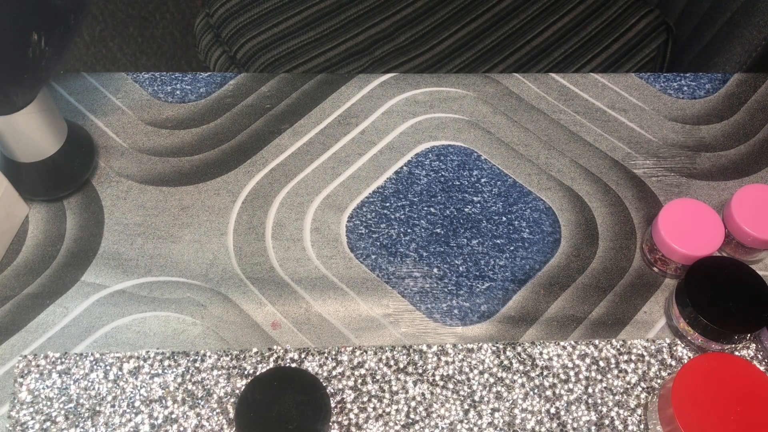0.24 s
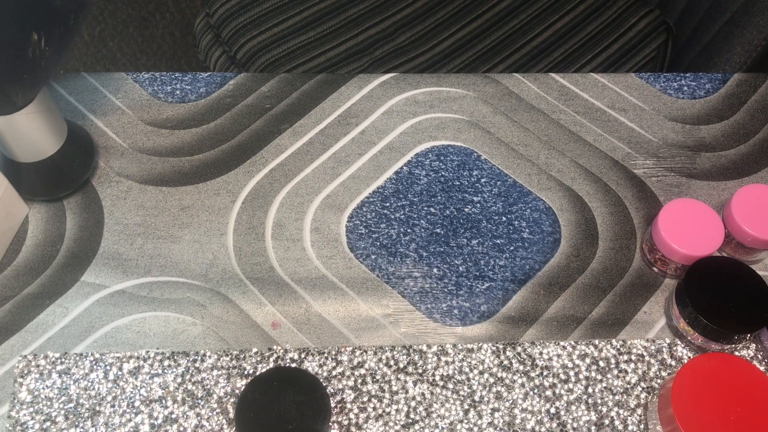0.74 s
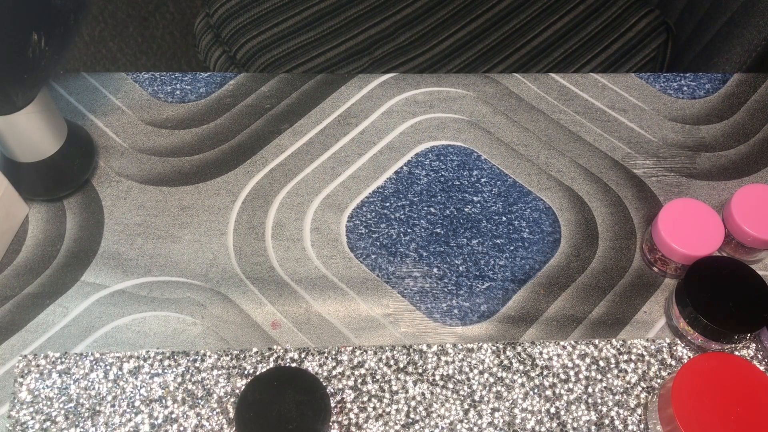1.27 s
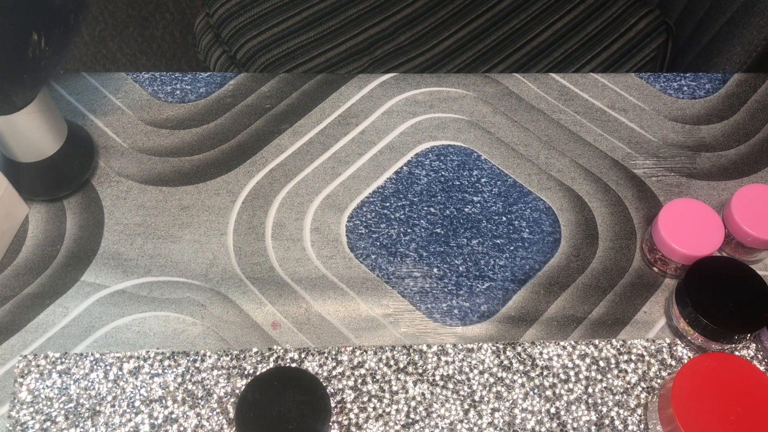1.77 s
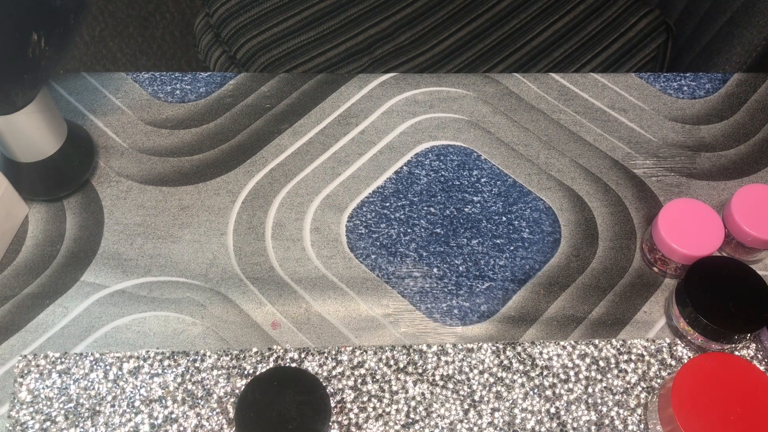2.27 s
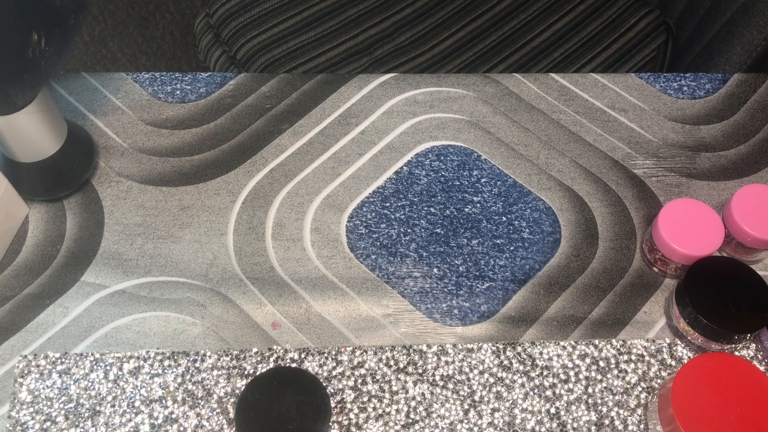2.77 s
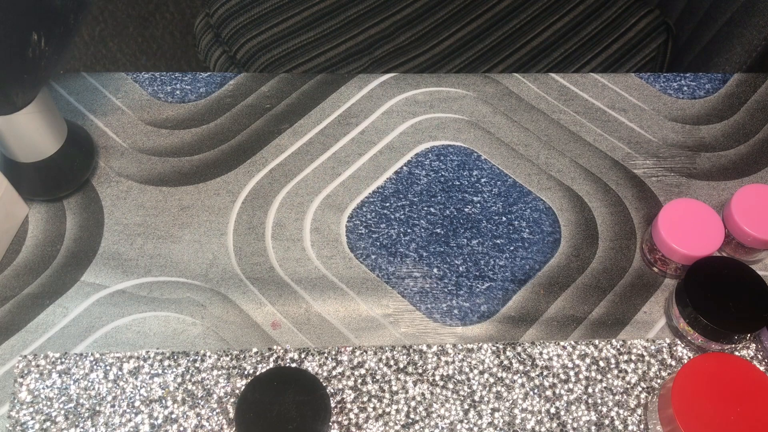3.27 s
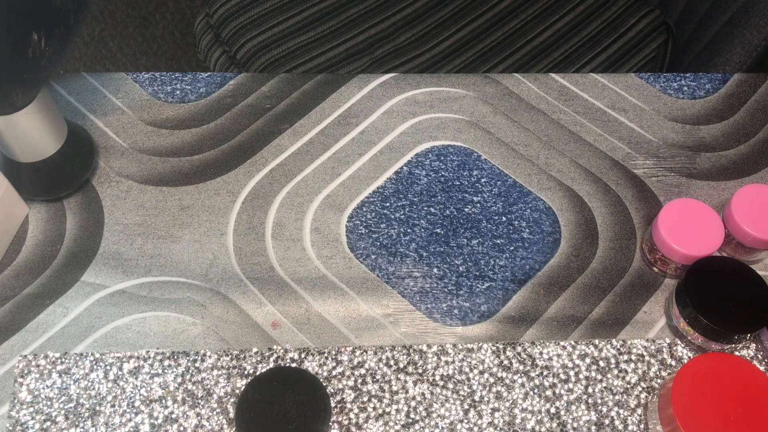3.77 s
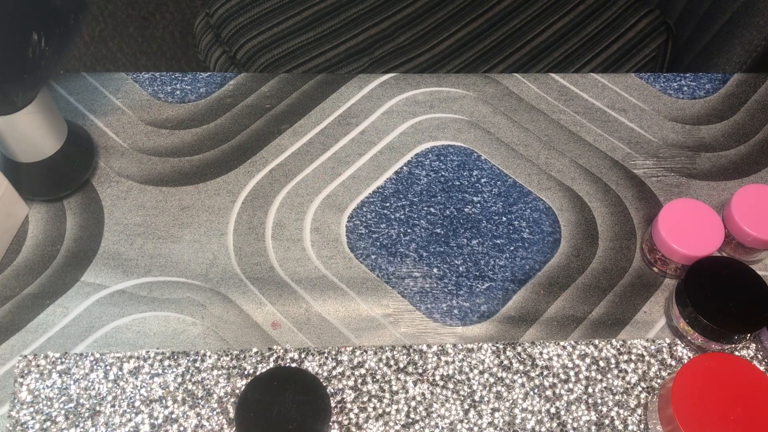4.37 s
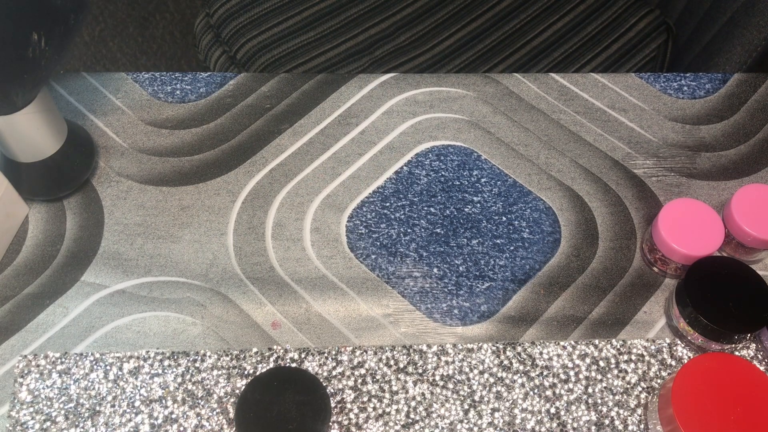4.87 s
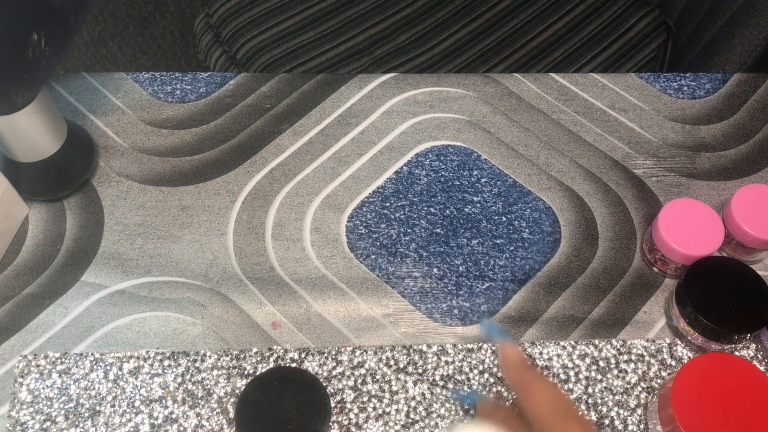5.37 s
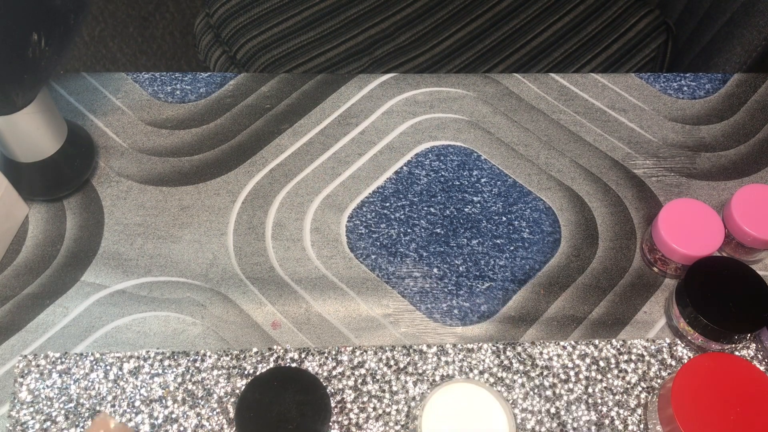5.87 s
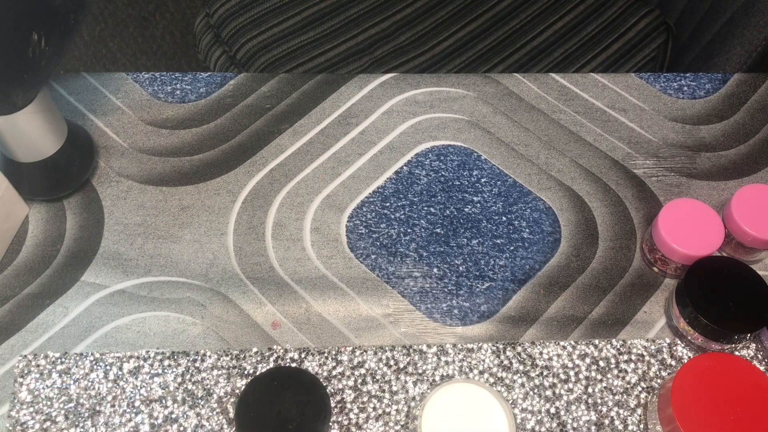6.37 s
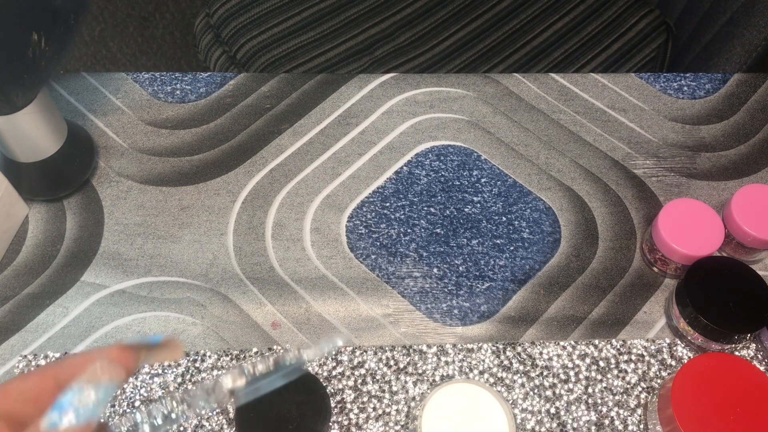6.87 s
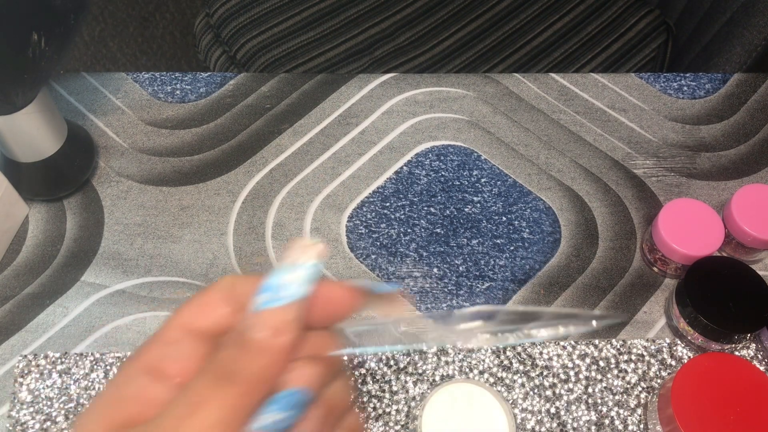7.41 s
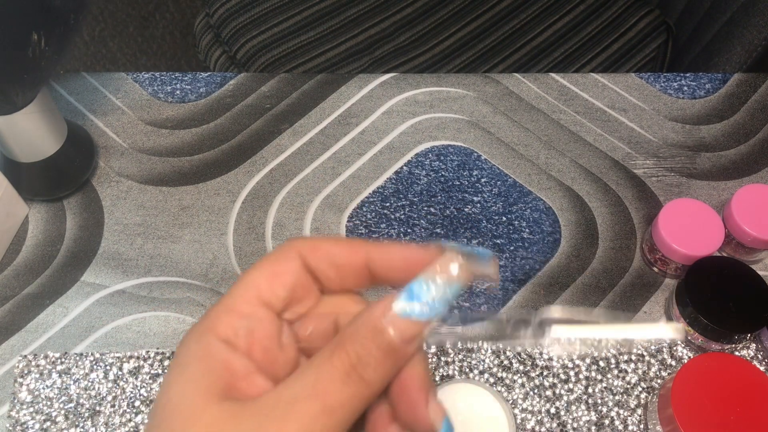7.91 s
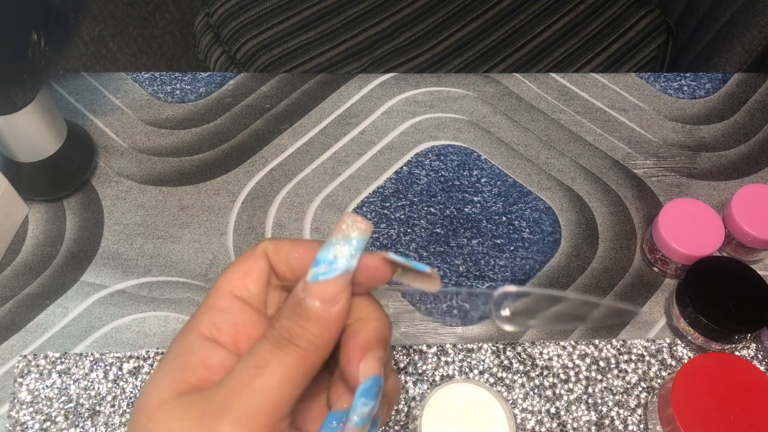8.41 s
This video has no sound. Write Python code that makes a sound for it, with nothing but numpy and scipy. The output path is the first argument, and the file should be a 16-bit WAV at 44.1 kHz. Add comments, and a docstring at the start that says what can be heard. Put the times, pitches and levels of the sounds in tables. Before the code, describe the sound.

Long nails tick on small plastic jars, a lid snaps and grates, a jar slides and knocks down, then faint clicks in a quiet room.

```python
"""Plastic jars on a table

Small plastic jars are handled close by on a table in a quiet room. Long nails tick and scratch on them,
a lid snaps loose and grates on its thread, a jar slides and is set down, then a thin plastic stick is picked up.
Ticks and rubbing are bursts of noise through plastic resonances; knocks are decaying sines.
The slide is gritty noise. Behind it, filtered noise makes the air and rumble;
the low hum is narrow noise with a steady sine.
"""
import sys
import numpy as np
from scipy import signal
from scipy.fft import rfft, irfft, next_fast_len
from scipy.io import wavfile

SR = 44100
rng = np.random.default_rng(int(sys.argv[2]) if len(sys.argv) > 2 else 0)


def generate_wav(signal):
    """Clip the signal to [-1, 1] and save it as 16-bit WAV at the path in sys.argv[1]."""
    frames = np.transpose(np.atleast_2d(signal))
    scaled = np.clip(frames, -1, 1) * 32767
    pcm = np.round(scaled).astype(np.int16)
    wavfile.write(sys.argv[1], SR, pcm)


N = 381450
TIME = np.arange(N) / SR


def from_db(db):
    """Decibels to gain."""
    return 10 ** (np.asarray(db) / 20)


def rms_one(x):
    """Scale to unit rms."""
    return x / np.sqrt(np.mean(x ** 2) + 1e-24)


def add(track, s, sound):
    """Mix a sound into the track at time s, trimming what runs past the end."""
    at = int(round(s * SR))
    track[at:at + len(sound)] += sound[:N - at]


def cut(x, hz, kind, order=2):
    """Butterworth filter."""
    return signal.sosfilt(signal.butter(order, hz, kind, fs=SR, output="sos"), x)


def resonate(x, modes):
    """Parallel resonances from (f/Hz, width/Hz, level/dB), with alternating signs."""
    out = 0
    for k, (hz, width, db) in enumerate(modes):
        r = np.exp(-np.pi * width / SR)
        poles = [1, -2 * r * np.cos(2 * np.pi * hz / SR), r * r]
        mode = signal.lfilter([1, 0, -1], poles, x) * (1 - r * r) / 2
        out = out + (-1) ** k * from_db(db) * mode
    return out


def ringing(modes):
    """Half a second of decaying sines from (f/Hz, level/dB, t60/s), neighbours in opposite phase."""
    t, out = TIME[:SR // 2], 0
    for k, (hz, db, t60) in enumerate(modes):
        decay = np.exp(-np.log(1000) * t / t60)
        out = out + (-1) ** k * from_db(db) * decay * np.sin(2 * np.pi * hz * t)
    return out


def at_hz(points, hz, column=1):
    """Read a table on a log-frequency axis."""
    points = np.array(points)
    return np.interp(np.log(hz), np.log(points[:, 0]), points[:, column])


def grains(count, per_s, spread_db, smooth):
    """Friction: random tiny slips of uneven size over a smooth hiss."""
    size_db = spread_db * np.minimum(rng.exponential(1, count), 3)
    sizes = from_db(size_db) * rng.choice([-1, 1], count)
    slips = sizes * (rng.random(count) < per_s / SR)
    return rms_one(slips) + smooth * rng.standard_normal(count)


def scatter(start, end, per_s):
    """Uneven moments in a span, one at a random place in each equal slot."""
    count = int(round((end - start) * per_s))
    return start + (end - start) * (np.arange(count) + rng.random(count)) / count


# Resonances of a jar's hollow inside, thin wall and hard edge: (f/Hz, width/Hz, level/dB)
HOLLOW = [(500, 160, -4.5), (1057, 280, -7.5), (1183, 720, -1), (1930, 620, 2)]
WALL = [(2760, 420, -2.5), (3010, 870, -4), (3382, 220, -7), (4296, 900, -11)]
EDGE = [(5918, 1200, 4), (7730, 1400, -1.5), (9180, 1800, -0.5), (11660, 2100, -2), (15300, 2700, -4)]


def plastic(force, hollow_db, edge_db, wall_spot, edge_spot, spot_spread_db=2.5):
    """A jar rings with its wall (unit rms), hollow and edge; each spot touched favours other modes."""
    def uneven(modes):
        return [(hz, width, db + spot_spread_db * rng.normal()) for hz, width, db in modes]

    hollow = cut(resonate(force, HOLLOW), [850, 2100], "band")
    wall = cut(resonate(force, wall_spot + uneven(WALL)), [2200, 4700], "band", order=3)
    edge = cut(resonate(force, uneven(EDGE) + edge_spot), 5100, "high", order=3)
    return from_db(hollow_db) * rms_one(hollow) + rms_one(wall) + from_db(edge_db) * rms_one(edge)


# Clearest plastic clicks: (t/s, wall level/dB over 5 ms, hollow level/dB re wall, edge level/dB re wall,
# wall f/Hz, contact t/s)
CLICKS = [(0.595, -62.5, 2, 1, 2520, .0011), (0.8392, -47.5, -17, -1.5, 4430, .0003),
          (0.978, -62, -7, -5, 2500, 0.0014), (1.1238, -60.5, -4, -14, 3150, .0011),
          (1.1451, -34.5, -15, 2, 2380, 0.00085), (1.202, -35.5, -10, 2.5, 3940, 0.00043),
          (1.436, -51.5, -23, 4, 2580, 0.00055), (1.4805, -54, -22, 14.5, 4440, 0.00024),
          (1.5923, -44.5, -33, -8, 4900, 0.00067), (1.6854, -25.5, -16.5, -8, 2830, 0.00095),
          (1.712, -31, -11, -8, 3230, 0.00039), (1.7168, -24.5, -10, -8, 3050, 0.0019),
          (1.7323, -33.5, -10, 2, 3000, 0.0012), (1.74, -24, -11, -8, 3940, 0.00046),
          (1.7644, -26.5, -11, -14, 3360, 0.00058), (1.7831, -24, -14, -8.5, 3370, 0.001),
          (1.8004, -37, -17, -15, 3010, 0.00073), (1.8171, -26.5, -13, -11, 3600, 0.00025),
          (1.8295, -38, -18.5, -1.5, 3580, 0.00085), (1.8515, -36, -7, -4.5, 3430, .0006),
          (1.8839, -34, -19, -5, 3300, 0.00056), (1.89, -42.5, -12, -2, 3400, 0.002),
          (1.9612, -52.5, -13, -2, 2900, 0.0005), (2.011, -61, -9, 4, 3000, .0006),
          (2.0215, -55, -8, 4.5, 3080, .0009), (2.1398, -42.5, -2, 3, 2830, 0.00045),
          (2.1441, -41, 1, -11.5, 2760, 0.00061), (2.938, -53.5, -13.5, 3, 3470, 0.00027),
          (3.0075, -42.5, -29.5, 1, 2860, 0.0033), (3.1216, -74, -3, 16.5, 4540, 0.0011),
          (3.3363, -60, -4.5, 5, 2353, 0.0052), (3.7858, -59, -26, -6.5, 3820, 0.003),
          (3.8696, -52.5, -7.5, -8.5, 4513, 0.0013), (3.9578, -42, -8, 3.5, 2600, 0.002),
          (3.9782, -46.5, 5.5, 10.5, 4460, 0.0025), (4.0311, -37, -2.5, -15, 2670, 0.0037),
          (4.0423, -42.5, -4, 2, 4230, 0.0015), (4.0905, -34, -3.5, -10.5, 2840, 0.0026),
          (4.2988, -38.5, -4.5, -5, 3000, 0.0018), (4.3222, -45, -5, -12, 3300, 0.00089),
          (4.3962, -44, -4, 5.5, 4670, 0.00072), (4.4065, -50, 5.5, 13.5, 3570, 0.0019),
          (4.5008, -53, 5.5, 7.5, 2730, 0.0023), (4.526, -50, -2, 7, 4200, 0.0019),
          (4.543, -55.5, -9, 7, 3550, 0.0017), (4.5705, -54, -12, 14.5, 4024, 0.0014),
          (4.6319, -52, -9, 13, 3210, .001), (4.6457, -55, -17, 14.5, 4400, .0025),
          (4.6847, -43, -9, -1, 3300, 0.0026), (4.7001, -41, -16, -4, 2860, 0.0018),
          (4.7226, -38, -32, -30, 3420, 0.00079), (4.7845, -61, -8, 6.5, 2840, 0.0008),
          (4.829, -50.5, -.5, 5.5, 3880, 0.0021), (4.8582, -51, -2.5, 0.5, 3750, 0.00051),
          (5.1508, -66, -1, 9, 2370, .0015), (5.2824, -53.5, -10, 9, 4120, 0.0027),
          (5.3148, -62, 0, 13, 2330, 0.00049), (5.457, -51, -12, -2, 2670, 0.0028),
          (5.5432, -48.5, 0, -5, 3700, 0.0038), (6.4389, -48, -0.5, -11, 2710, 0.00078),
          (6.4555, -51, -6, -15, 2940, 0.0032), (6.634, -60.5, -9, 4.5, 4000, 0.00031),
          (6.7967, -59, -12, 7, 4080, 0.00078), (7.0143, -54, -6.5, -0.5, 3585, 0.00075),
          (7.2123, -60.5, -13.5, 6, 4375, 0.00026), (7.289, -66.5, -15, 1.5, 2760, 0.0016),
          (7.3693, -66, -17, 3, 2830, 0.0011), (7.434, -59, -20, -22, 3460, 0.0027),
          (7.6872, -57, -5, 2, 3594, 0.0012), (7.934, -71, -2.5, 2, 3210, .0011),
          (8.0776, -61, -9.5, -3.5, 3705, 0.00049)]


def clicks(rows, snap=1.2, rise_s=0.00022, linger=2.3, chatter=0.13, chatter_s=0.0027):
    """Each click is a snap and a burst of micro-slips; the spot touched adds pitches of its own."""
    out, t = np.zeros(N), TIME[:SR // 40]
    level_window_s = 0.005
    for s, db, hollow_db, edge_db, wall_hz, contact_s in rows:
        burst = np.exp(-(t / (linger * contact_s)) ** 2)
        tail = chatter * np.exp(-t / chatter_s)   # the parts chatter on faintly
        force = rng.standard_normal(len(t)) * (1 - np.exp(-t / rise_s)) * (burst + tail)
        force[0] += 2 * snap
        edge_hz = 6270 * 2 ** (0.22 * edge_db)   # a stronger edge rings higher, 0.22 octaves per dB
        click = plastic(force, hollow_db, edge_db, [(wall_hz, 560, 8)], [(edge_hz, 1300, 0)])
        add(out, s, from_db(db) * np.sqrt(level_window_s / t[-1]) * click)
    return out


# Strokes of nails and thread on plastic: (start t/s, end t/s, wall level/dB, hollow level/dB re wall,
# edge level/dB re wall, f/Hz)
STROKES = [(0.569, 0.608, -78, 4, 4, 3000), (0.709, 0.868, -80, -2, -4, 3620),
           (1.419, 1.476, -68.5, -4, 8, 3030), (1.468, 1.51, -63.5, -19, 3.5, 3330),
           (1.564, 1.621, -60.5, -27, -0.5, 3530), (1.661, 1.872, -60.5, -9, -1.5, 3320),
           (1.864, 1.942, -62.5, -2.5, -3.5, 3200), (2.506, 2.548, -74.5, -3, -12, 2580),
           (3.254, 3.574, -82, -1.5, 2.5, 2990), (3.391, 3.469, -72, -19, -12, 2220),
           (3.845, 3.969, -71.5, -3.5, -5, 3800), (3.962, 4.084, -59, -3, -1, 3570),
           (4.297, 4.376, -58.5, -5, -7, 2480), (4.364, 4.458, -60.5, 1, 2.5, 3120),
           (4.502, 4.648, -60, -1.5, 1, 2500), (4.633, 4.744, -57, 0, 4, 3140),
           (4.741, 4.914, -64.5, -2.5, -1, 2570), (6.448, 6.501, -58, -8, -8.5, 2700),
           (6.49, 6.624, -71, -10, 7.5, 3270), (6.627, 6.679, -63, -13, -3, 4200),
           (7.201, 7.297, -80, -7.5, -2, 3500), (7.423, 7.6, -77.5, -6.5, 2, 2400)]


def rubbing(catches_per_s=380, catch_db=2.5, catch_s=0.0018, drag=0.42, fade_s=0.0079, squeak=1.3):
    """Nails and the lid's thread drag over the plastic, catching and letting go in little bursts of grit."""
    out = np.zeros(N)
    for start, end, db, hollow_db, edge_db, hz in STROKES:
        length = end - start
        t = TIME[:int((length + .02) * SR)]
        pressure = np.clip(np.minimum(t, length - t) / fade_s, 0, 1)
        catches = np.abs(grains(len(t), catches_per_s, spread_db=catch_db, smooth=0))
        grip = drag + rms_one(signal.lfilter([1], [1, -np.exp(-1 / (catch_s * SR))], catches))
        force = pressure * grip * rng.standard_normal(len(t))
        spot = [(hz, 330, -squeak * edge_db)]   # a duller stroke squeaks more at its own pitch
        add(out, start, from_db(db) * plastic(force, hollow_db, edge_db, spot, []))
    return out


def slip_ticks(slips_per_s=30, slip_db=3.5, spread_db=5, slip_edge_db=4, contact_s=0.0009):
    """A dragging nail now and then slips with a tick: small clicks strewn over the strokes."""
    rows = []
    for start, end, db, hollow_db, edge_db, _ in STROKES:
        for s in scatter(start, end, slips_per_s):
            tick_db = db + slip_db + spread_db * rng.normal()
            wall_hz = rng.uniform(2312, 4500)
            rows.append((s, tick_db, hollow_db, edge_db + slip_edge_db, wall_hz, contact_s))
    return clicks(rows)


def slide_gain(db, slowing_db_per_s, start_s=5.015, stop_s=5.57, attack_s=0.047):
    """A quick push, a steady fade as the jar slows, and a release once it stops."""
    t = np.maximum(TIME - start_s, 0)
    push_db = 9 * np.exp(-t / 0.057)
    release_db = 43 * np.maximum(TIME - stop_s, 0)   # 43 dB per second
    return np.minimum(t / attack_s, 1) * from_db(db + push_db - slowing_db_per_s * t - release_db)


# Resonances of the sliding jar: (f/Hz, width/Hz, level/dB)
SLIDE_BODY = [(673, 200, 6), (1680, 710, 5), (3110, 1100, 0)]


def sliding():
    """The jar's base brushes across the mat: the jar resonates and the mat's fibres hiss."""
    base, fibres = [grains(N, per_s=4500, spread_db=5.5, smooth=0.9) for _ in range(2)]
    body = rms_one(cut(resonate(base, SLIDE_BODY), [550, 5500], "band", order=3))
    hiss = rms_one(cut(fibres, [3600, 9500], "band", order=1))
    return slide_gain(db=-61.5, slowing_db_per_s=7.5) * body + slide_gain(db=-64.0, slowing_db_per_s=15.5) * hiss


# Dull, hollow plastic knocks, some from a lid laid on the table: (t/s, level/dB, f/Hz, t60/s)
TOCKS = [(2.1447, -45, 543, 0.041), (2.1465, -44, 1610, 0.018), (3.009, -49.5, 680, 0.023),
         (3.5292, -42, 1800, 0.04), (3.805, -62, 980, 0.037), (3.85, -60, 990, 0.099),
         (5.882, -48, 1310, 0.013), (8.378, -63.5, 1750, 0.024)]


def tocks(split=0.082):
    """Each dull, hollow plastic knock rings as a cluster of three close modes around its pitch."""
    out = np.zeros(N)
    for s, db, hz, t60 in TOCKS:
        cluster = [(hz * (1 - 2 * split), -4, t60),
                   (hz * (1 - split / 2), -2, t60),
                   (hz * (1 + 1.63 * split), 2, t60)]
        add(out, s, from_db(db) * ringing(cluster))
    return out


# A soft bump on the table, then a jar lands and rocks on it: (t/s, level/dB, contact t/s)
LANDING = [(4.201, -51, 0.017), (5.5436, -43.5, 0.00042), (5.5479, -30, 0.0015), (5.5577, -39.5, 0.0025)]
# Modes of the table top: (f/Hz, level/dB, t60/s)
TABLE = [(104, 7.5, 0.017), (153, -9, 0.15), (185, -1, 0.039), (303, 0.5, 0.04), (367, -3.5, 0.18),
         (574, -7, 0.028), (1050, -1, 0.015), (1640, -22, 0.013)]


def landing():
    """Each contact pushes the table's modes into ringing; a longer contact is duller."""
    out = np.zeros(N)
    for s, db, contact_s in LANDING:
        push = np.exp(-TIME[:SR // 50] * 2 * np.pi / contact_s)
        add(out, s, from_db(db) * np.convolve(ringing(TABLE), push / push.sum()))
    return out


# Modes of one thin, glassy ting: (f/Hz, level/dB, t60/s)
TING = [(3741, -46, .28), (3830, -50, .16), (6729, -54, .1), (11740, -51, .08)]


def ting():
    """Something glassy rings once as a few high decaying sines."""
    out = np.zeros(N)
    add(out, 4.043, ringing(TING))
    return out


# Room echo: (f/Hz, level/dB re the direct sound, t60/s)
ECHO = [(154.5, -13.5, 0.24), (610, 0, 0.14), (1500, -10, 0.19), (3170, -15.5, 0.21), (7000, -15.5, 0.18),
        (15000, -20.5, 0.19)]


def room(x, first_s=0.0033, build_s=0.002):
    """Dense reflections build up and die away, each frequency band at its own rate."""
    t, response = TIME[:SR // 2], 0
    edges = np.geomspace(90, 18000, 12)
    onset = 1 - np.exp(-np.maximum(t - first_s, 0) / build_s)
    for low, high in zip(edges, edges[1:]):
        hz = np.sqrt(low * high)
        decay = onset * np.exp(-np.log(1000) * t / at_hz(ECHO, hz, column=2))
        band = cut(rng.standard_normal(len(t)), [low, high], "band")
        response = response + from_db(at_hz(ECHO, hz)) * band * decay / np.sqrt(np.sum(decay ** 2))
    return signal.fftconvolve(x, response)[:N]


# Spectrum of the air, relative: (f/Hz, level/dB per Hz)
AIR = [(180, -31), (300, -9.5), (348, -4), (511, -8.5), (603, -6), (1120, -8.5), (1500, -16), (3580, -21),
       (7820, -25.5), (9390, -24), (10200, -29), (12900, -23), (16000, -28.5)]
# Resonances of the hum and of the rumble, relative: (f/Hz, width/Hz, level/dB)
HUM = [(47, 1.9, 0.5), (51, 16, -9.5), (72, 18, -11.5), (122, 15, -18), (156.66, 3.2, -8)]
RUMBLE = [(94, 209, -2), (231.5, 116, 1), (341, 98, -10.5)]
# Swells of the low background: (centre t/s, half length t/s, hum level/dB, rumble level/dB)
SWELLS = [(1.0, 0.32, 3.5, 3), (4.09, 1, 1.5, 2.5), (5.824, 0.44, 8, 0)]


def background(air_db=-70, hum_db=-61.5, rumble_db=-65.5, steady_db=-1, settle_db_per_s=0.17):
    """Air is shaped noise, rumble is noise through broad resonances, hum is narrow noise with a steady sine."""
    white = rng.standard_normal((3, N + SR))   # a spare second lets the resonances build up
    size = next_fast_len(N)
    hz = np.maximum(np.fft.rfftfreq(size, 1 / SR), 1)
    air = irfft(rfft(white[0], size) * from_db(at_hz(AIR, hz)), size)[:N]
    air = cut(air, 380, "high", order=3)
    wavering = cut(resonate(white[1], HUM), [36, 260], "band", order=4)[SR:]
    steady = np.sin(2 * np.pi * HUM[0][0] * TIME)   # at the lowest hum resonance
    hum = rms_one(wavering) + from_db(steady_db) * rms_one(steady)
    rumble = cut(resonate(white[2], RUMBLE), [55, 430], "band", order=3)[SR:]

    settle_db = settle_db_per_s * (TIME.mean() - TIME)   # air and rumble sink slowly, nominal midway
    hum_swell_db, rumble_swell_db = np.zeros((2, N))
    for s, half_s, hum_rise_db, rumble_rise_db in SWELLS:
        swell = np.exp(-np.abs((TIME - s) / half_s) ** 4)
        hum_swell_db += hum_rise_db * swell
        rumble_swell_db += rumble_rise_db * swell
    return (from_db(air_db + settle_db) * rms_one(air)
            + from_db(hum_db + hum_swell_db) * rms_one(hum)
            + from_db(rumble_db + settle_db + rumble_swell_db) * rms_one(rumble))


def scene():
    """Close handling sounds, their echo and the room's own sound."""
    handling = clicks(CLICKS) + rubbing() + slip_ticks() + sliding() + tocks() + landing() + ting()
    return (handling + room(handling) + background())[None]


def record(dry):
    """The deepest bass is lost and the top is cut steeply."""
    thinned = cut(dry, 26, "high", order=3)
    return signal.sosfilt(signal.ellip(10, .1, 80, 16100, fs=SR, output="sos"), thinned)


dry = scene()
out = record(dry)
generate_wav(out)
```